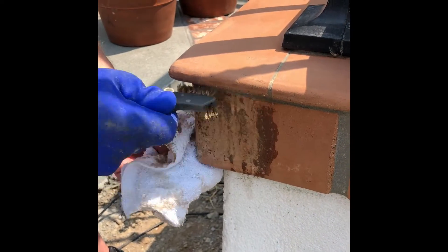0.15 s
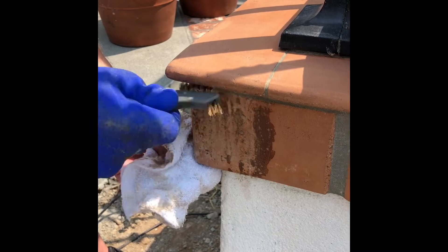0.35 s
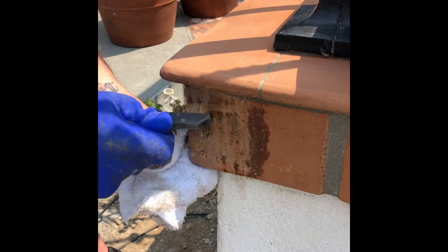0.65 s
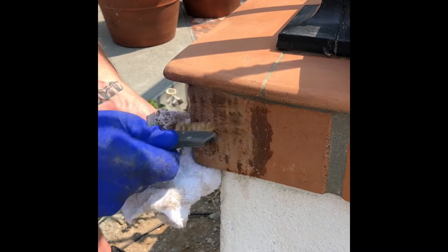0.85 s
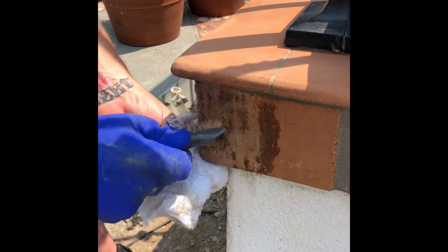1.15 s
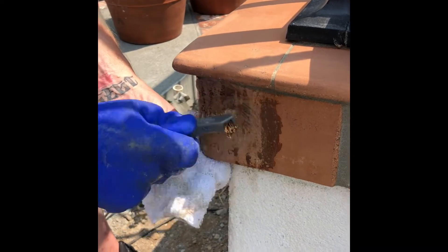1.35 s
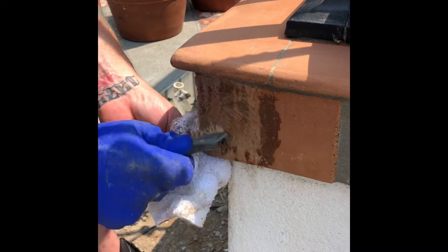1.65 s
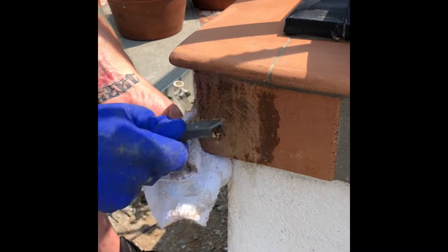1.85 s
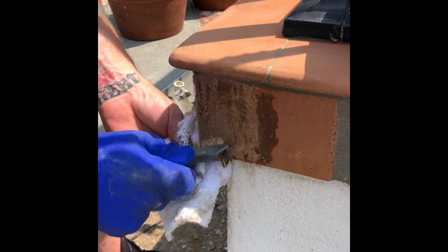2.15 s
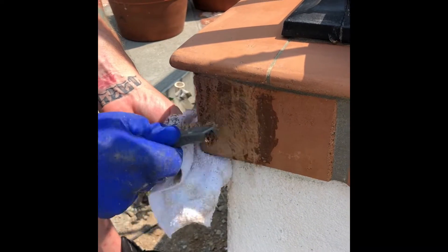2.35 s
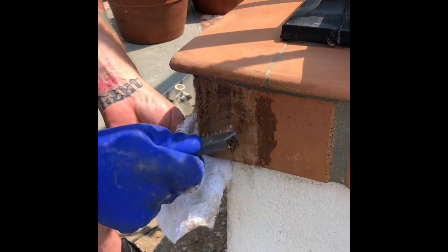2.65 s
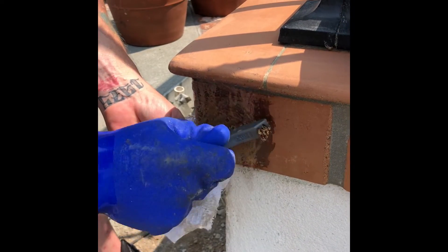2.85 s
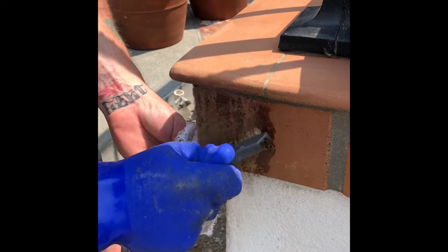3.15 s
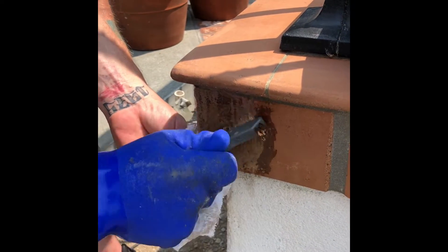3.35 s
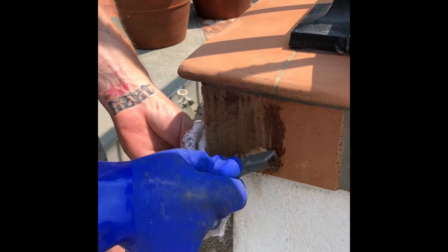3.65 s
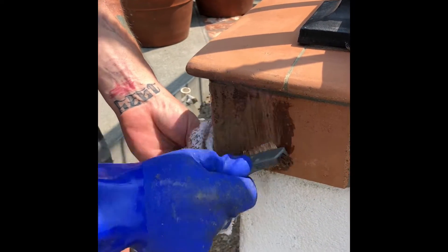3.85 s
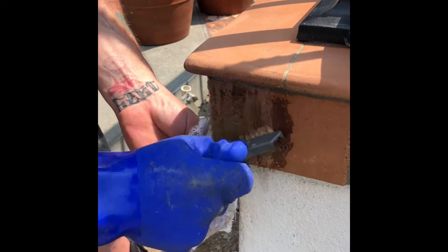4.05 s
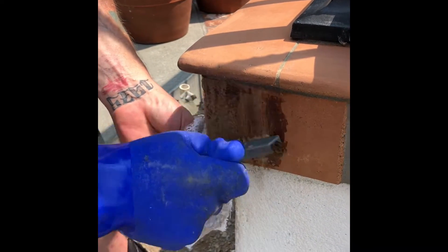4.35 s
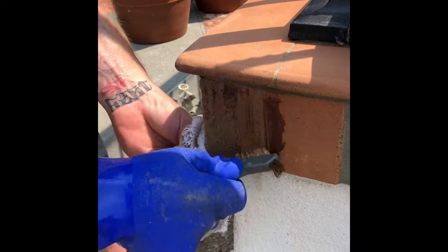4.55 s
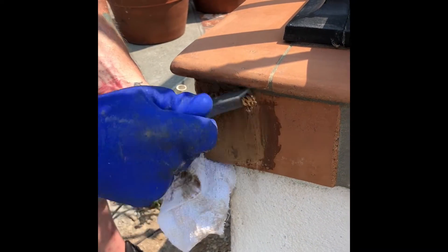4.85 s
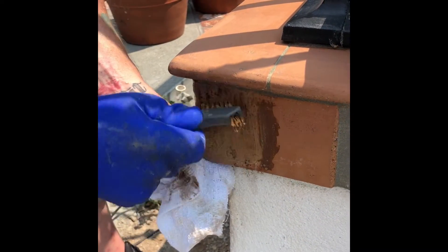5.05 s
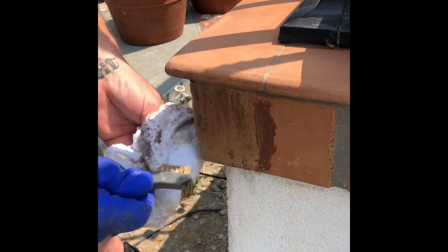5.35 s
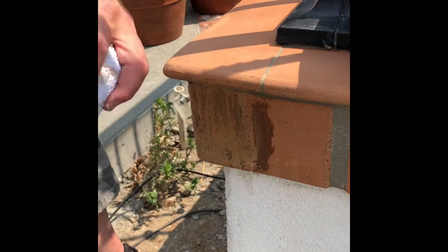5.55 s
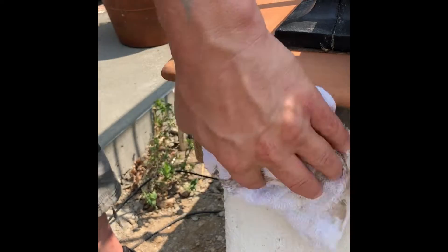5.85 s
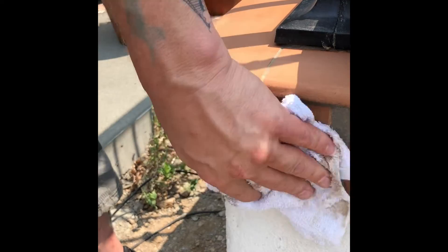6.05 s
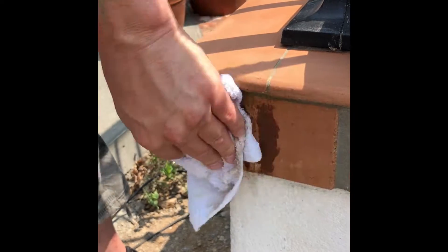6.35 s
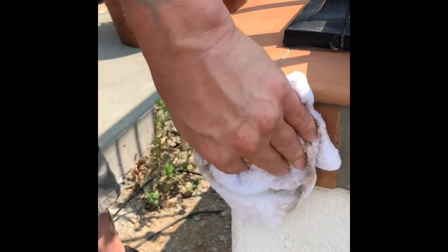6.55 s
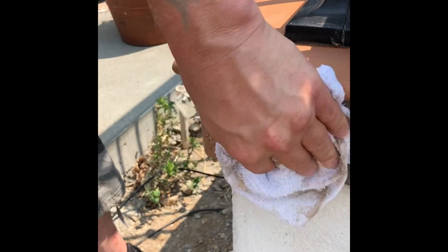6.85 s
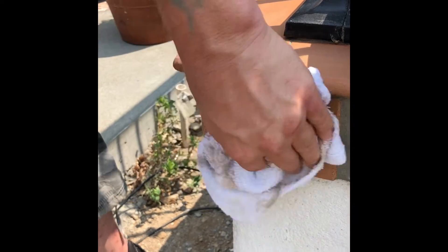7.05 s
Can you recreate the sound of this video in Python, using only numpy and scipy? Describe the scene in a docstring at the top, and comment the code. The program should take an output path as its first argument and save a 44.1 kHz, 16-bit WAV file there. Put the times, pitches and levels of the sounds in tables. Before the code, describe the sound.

A small wire brush scrubs rough tile outdoors in quick scratchy strokes, then a rag softly wipes it.

```python
"""An outdoor step, one mono microphone close to a wet, rough tile, quiet air behind it.
A small wire brush starts with quick strokes: each wire snags on the grit, slips and rings.
From 1 s it rubs steadily; from 3 s come harder strokes, some jamming with a dry tick.
Just after 5 s the brush is lifted, a rag is gathered up, and its fibres hiss through six wipes.
Soft low bumps reach the microphone throughout."""
import sys
import numpy as np
from scipy import signal
from scipy.fft import rfft, irfft, next_fast_len
from scipy.io import wavfile

SR = 44100
rng = np.random.default_rng(int(sys.argv[2]) if len(sys.argv) > 2 else 0)


def output_pcm(signal):
    """Save a mono or channel-first signal as 16-bit PCM at the path in sys.argv[1].

    Samples are clipped to [-1, 1] before scaling.
    """
    pcm = np.clip(np.atleast_2d(signal).T, -1, 1) * 32767
    wavfile.write(sys.argv[1], SR, np.round(pcm).astype(np.int16))


N = 317123

# brush pushed away, wires digging in: (start [s], length [s], level [dB])
PUSH_STROKES = [(-0.055, 0.12, -34.5), (0.16, 0.13, -34), (0.392, 0.12, -33.3), (0.622, .125, -32.5),
                (0.86, 0.12, -32), (3.036, 0.15, -34), (3.294, 0.11, -31), (3.521, 0.11, -30.5),
                (3.732, 0.12, -30.6), (3.969, 0.091, -28.5), (4.192, 0.1, -29), (4.412, 0.1, -29.6),
                (4.64, 0.12, -29.5), (4.864, 0.11, -28.5), (5.092, .1, -29)]
# brush pulled back, wires trailing: (start [s], length [s], level [dB])
PULL_STROKES = [(0.053, 0.12, -34), (0.277, 0.13, -35.5), (0.495, 0.14, -35), (0.744, 0.13, -35.2),
                (3.188, 0.12, -33), (3.407, .12, -32), (3.63, 0.11, -31), (3.849, 0.12, -32.5),
                (4.066, 0.14, -32.5), (4.295, .12, -32), (4.523, 0.13, -31.2), (4.75, 0.12, -31.5),
                (4.963, 0.13, -33.5)]
# steady rubbing without a turn: (start [s], end [s], level [dB])
RUB_SPELLS = [(0.964, 3.066, -38), (5.14, 5.377, -36.5)]
# the hand bears down once a round: (time [s], half-width [s], level [dB])
RUB_SWELLS = [(1.157, 0.094, -32), (1.403, 0.061, -32), (1.657, 0.049, -30.5), (1.905, 0.055, -33),
              (2.135, 0.055, -33), (2.397, 0.044, -34.5), (2.674, 0.039, -32.5)]
# scratch of the wire tips: (frequency [Hz], level [dB])
SCRATCH_SPECTRUM = [(500, -16), (1300, -23), (2100, -15.5), (2800, -1.5), (4400, -2), (6000, -1),
                    (7000, 1.3), (8300, 1.2), (9400, -2), (12500, -0.9), (14200, -0.5), (16000, -4.5)]
# treble as the brush tilts and moves over the tile: (time [s], gain [dB])
TILT_TREBLE = [(0, 1), (0.35, -2.5), (0.68, 2.5), (1.0, -3.5), (1.5, -0.5), (2.5, -2.5), (3.35, 0),
               (4.5, -2.5), (5.3, -3)]
# bending resonances of the wire tufts: (frequency [Hz], width [Hz], gain [dB])
TUFT_MODES = [(2750, 170, -3.5), (3135, 290, 0), (4070, 270, 0.5), (4950, 280, 1), (5910, 350, 3)]
# plastic head and handle under pressure: (frequency [Hz], level [dB])
HANDLE_SPECTRUM = [(400, -33), (900, -10), (1400, -4), (2000, 2), (2700, 1), (3600, -0.5), (6000, -31)]
# tufts jamming at the end of a hard stroke: (time [s], level [dB])
JAM_TICKS = [(1.954, -41.5), (4.048, -25.5), (4.281, -32), (4.503, -24.5), (4.952, -37), (5.176, -24.5)]
# rag wipes: (start [s], length [s], attack [s], level [dB], hollow rub gain [dB], treble gain [dB])
RAG_WIPES = [(6.085, 0.29, 0.097, -38, -11, 0.5), (6.383, 0.2, 0.082, -42, -4.5, -1),
             (6.615, 0.14, 0.032, -39, -3, 7), (6.771, 0.13, .033, -42.5, -1, 1.5),
             (6.925, 0.13, 0.056, -31.5, -10.5, -11), (7.087, 0.1, 0.018, -45, 0.5, 5)]
# hiss of the rag's fibres: (frequency [Hz], level [dB])
FIBRE_SPECTRUM = [(1200, -47), (2000, -11), (3200, -7.5), (4200, -3), (5700, 1), (7700, 0.5), (10000, -2.5),
                  (13000, -4.5), (16000, -11.5)]
# hollow rub under the pressing hand: (frequency [Hz], level [dB])
HOLLOW_SPECTRUM = [(150, -23), (400, -6.5), (700, -4), (1050, 0.5), (1500, -4.5), (2200, -7), (3500, -7)]
# the rag is gathered and rustles on while it wipes: (time [s], level [dB])
RUSTLE_LEVELS = [(5.38, -59), (5.57, -58), (5.72, -64.5), (5.82, -54.5), (5.95, -52.5), (6.02, -57.5),
                 (6.38, -58), (6.6, -58), (7.19, -61)]
# rustling cloth: (frequency [Hz], level [dB])
RUSTLE_SPECTRUM = [(700, 6), (1200, 8), (3000, -11), (5200, -3.5), (8000, -12.5), (12000, -16),
                   (16000, -21)]
# the glove creases on the handle: (time [s], level [dB])
GLOVE_CREASES = [(0.34, -54.5), (0.6, -55.5), (1.07, -55), (1.98, -49.5), (3.3, -74)]
# creasing rubber: (frequency [Hz], level [dB])
CREASE_SPECTRUM = [(250, -3), (550, -6), (1000, 1), (1300, -6.5), (2000, -20)]
# stronger bumps on the microphone: (time [s], level [dB], pitch [Hz])
STRONG_BUMPS = [(0.038, -35, 184), (0.225, -34, 204), (0.441, -32, 88), (0.685, -34, 109),
                (0.775, -35.5, 151), (1.43, -35, 208), (1.65, -28, 132), (1.848, -27, 270.4),
                (1.958, -30.5, 209), (2.016, -26, 175), (2.103, -26, 147), (2.179, -33.5, 243),
                (2.227, -25.5, 198), (2.474, -34.5, 163), (2.701, -34, 216), (2.963, -38.5, 224),
                (3.07, -32.5, 224), (3.284, -34.5, 152), (3.61, -35, 110), (3.87, -32.5, 102),
                (3.9, -29.5, 187), (4.002, -23, 245), (4.724, -39.5, 102), (5.355, -34.5, 186),
                (5.868, -38, 109), (6.131, -35.5, 212), (6.707, -35.5, 251), (6.86, -36, 173),
                (7.006, -31.5, 298), (7.056, -35.5, 158)]
# rise and fall of the low rumble: (time [s], level [dB])
RUMBLE_LEVELS = [(0, -48.5), (0.7, -48.5), (1.46, -56.5), (2.16, -45), (2.75, -59), (3.1, -48.5),
                 (3.65, -59.5), (4.0, -50.5), (4.35, -58.5), (4.85, -54), (5.6, -62), (6.6, -58.5),
                 (7.19, -45)]
# colour of the rumble: (frequency [Hz], level [dB])
RUMBLE_SPECTRUM = [(20, -29), (40, -5.5), (65, 4), (110, -7), (160, -6.5), (260, -10), (450, -19),
                   (900, -49)]
# distant outdoor wash: (frequency [Hz], level [dB])
AIR_SPECTRUM = [(25, -19), (60, -1.5), (150, 6.5), (320, -2.5), (600, 0.5), (1150, 1.5), (2000, -2),
                (3200, -8.5), (6000, -20.5), (16000, -32)]
# steady low resonances in the wash: (frequency [Hz], width [Hz], gain [dB])
DRONE_MODES = [(66.4, 12, 3.5), (152, 37, 10.5)]

USUAL_STROKE_DB, BRUSH_LIFT_S = -30.5, 5.35


def brush():
    """Wire tips slip on the grit, close up; pressure adds slips, treble and handle, and damps the tufts."""
    level = friction_level()
    effort = level / level.max()
    pressure_db = np.maximum(20 * np.log10(level + 1e-9) - USUAL_STROKE_DB, -6)
    snaps = slips(per_s=3000 + 45000 * effort, spread_db=3.5)
    pings = wire_pings(per_s=5000 + 12000 * effort)
    scratch = coloured(snaps + from_db(-7.5) * pings, SCRATCH_SPECTRUM, TUFT_MODES)
    tilt_db = np.interp(seconds(), *np.transpose(TILT_TREBLE))
    treble_db = -0.3 + 0.62 * pressure_db + tilt_db + 1.1 * drift(14)
    tufts = from_db(-15 - 0.5 * pressure_db) * tuft_snags()
    handle = from_db(-15.5 + 0.64 * pressure_db) * noise(HANDLE_SPECTRUM)
    grit = from_db(0.85 * drift(70) + 0.6 * drift(350))
    return level * grit * (brightened(scratch, treble_db, corner_hz=9600) + tufts + handle)


def friction_level():
    """Pushes, pulls and rounds of rubbing add in power to give the level of the brush."""
    power = from_db(-57) ** 2 * (seconds() < BRUSH_LIFT_S)   # the wires still touch at the turns
    for start, length, db in PUSH_STROKES:
        brake_s = 0.027 * 0.5 ** (max(db - USUAL_STROKE_DB, 0) / 2)   # harder pushes stop faster
        push = stroke(start, length, attack_s=0.051, curve=1.19, brake_s=brake_s, db_per_s=27)
        flip = from_db(-13.5) * bell(start + length + 0.0077, 0.018)   # the wires flip over
        power += from_db(db) ** 2 * (push ** 2 + flip ** 2)
    for start, length, db in PULL_STROKES:
        pull = stroke(start, length, attack_s=0.038, curve=1.54, brake_s=0.033, db_per_s=-34)
        power += (from_db(db) * pull) ** 2
    waver_db = -0.8 * drift(25)
    for s, width, db in RUB_SWELLS:
        power += (from_db(db) * bell(s, width)) ** 2
        waver_db -= 2.5 * bell(s + 0.045, 0.021)   # the hand eases off
        waver_db += 0.84 * bell(s + 0.12, 0.054)   # the way back is a little louder
    for start, end, db in RUB_SPELLS:
        power += (from_db(db + waver_db) * held(start, end, attack_s=0.065, release_s=0.043)) ** 2
    return np.sqrt(power)


def stroke(start_s, length_s, attack_s, curve, brake_s, db_per_s):
    """Level of one stroke: the wires bite, hold under changing pressure, and brake late."""
    at = np.arange(max(int(start_s * SR) + 1, 0), int((start_s + length_s) * SR))
    t = at / SR - start_s
    bite = np.clip(t / attack_s, 0, 1) ** curve
    speed = 1 - np.clip(1 - (length_s - t) / brake_s, 0, 1) ** 1.11
    out = np.zeros(N)
    out[at] = bite * speed ** 2 * from_db(db_per_s * (t - length_s / 2))
    return out


def wire_pings(per_s, low_hz=2473, high_hz=11980, count=44, contact_db=10.5):
    """Single wires spring free and ring, each at its own pitch, as they come in and out of contact."""
    plucks = slips(per_s, spread_db=1.5)
    plucked_wire = rng.integers(0, count, N)
    pitches = np.geomspace(low_hz, high_hz, count) * (1 + 0.016 * rng.standard_normal(count))
    contact_times = np.arange(0, N / SR, 0.07)
    out = np.zeros(N)
    for wire, hz in enumerate(pitches):
        at = np.flatnonzero(plucked_wire == wire)
        contact = np.interp(at / SR, contact_times, rng.uniform(-1.05, 1, len(contact_times)))
        clicks = np.zeros(N)
        clicks[at] = plucks[at] * from_db(contact_db * contact) * np.sqrt(hz)
        out += ring(clicks, hz, t60_s=0.021)
    return rms_one(out)


def tuft_snags(swing_db=12):
    """The four lowest tuft resonances ring louder and softer as each tuft catches on the grit."""
    out = np.zeros(N)
    for hz, _, _ in TUFT_MODES[:4]:
        catch = from_db(swing_db * np.tanh(drift(18)))
        out += ring(slips(per_s=4000, spread_db=0) * catch, hz, t60_s=0.012)
    return rms_one(out)


def slips(per_s, spread_db):
    """Tiny random snaps of slipping wire, of even power whatever their rate."""
    chance = np.clip(per_s / SR, 1e-4, 1)
    sizes = from_db(spread_db * np.minimum(rng.exponential(1, N), 5)) * rng.choice([-1, 1], N)
    return rms_one(sizes * (rng.random(N) < chance) / np.sqrt(chance))


def jams(start_hz=3090):
    """The wires stop against the tile: their rough chatter slows and dies in a few milliseconds."""
    ticks = [(s, db, start_hz) for s, db in JAM_TICKS]
    chatter = falling_swings(ticks, rise_s=0.0007, decay_s=0.0026, sag_s=0.00345, end_hz=1080, rough=1.75)
    return bass_cut(chatter, corner_hz=700, order=3)


def rag():
    """Countless fibres hiss over the tile while the pressing hand adds a hollow rub."""
    hiss_level, rub_level, treble_db = np.zeros((3, N))
    for start, length, attack, db, rub_db, bright_db in RAG_WIPES:
        speed = held(start, start + length, attack, release_s=0.24 * length)
        hiss_level += from_db(db) * speed ** 2
        rub_level += from_db(db + rub_db) * speed   # the rub outlasts the hiss
        treble_db += bright_db * speed
    hiss = hiss_level * brightened(noise(FIBRE_SPECTRUM), treble_db, corner_hz=9000)
    rub = rub_level * noise(HOLLOW_SPECTRUM)
    return (hiss + rub) * from_db(0.7 * drift(110))


def hands():
    """A rubber glove creases faintly while it holds the brush; later the cloth rustles in the hand."""
    grip = from_db(-68) * (seconds() < BRUSH_LIFT_S)
    creases = sum(from_db(db) * bell(s, 0.077) for s, db in GLOVE_CREASES)
    glove = (grip + creases) * from_db(3 * drift(30)) * noise(CREASE_SPECTRUM)
    cloth = gain_curve(RUSTLE_LEVELS) * noise(RUSTLE_SPECTRUM)
    return glove + cloth


def microphone_bumps(small_per_s=12, low_hz=97.4, high_hz=231.5):
    """Soft buffets on the microphone, thinned by its bass cut; small random ones follow the rumble."""
    timing, strength, pitch = rng.random((200, 3)).T
    s = (np.arange(len(timing)) + timing) / small_per_s
    db = np.interp(s, *np.transpose(RUMBLE_LEVELS)) + 10 + 2.5 * (2 * strength - 1)
    hz = low_hz * (high_hz / low_hz) ** pitch
    small = np.column_stack([s, db, hz])[s < N / SR]
    bumps = list(STRONG_BUMPS) + list(small)
    swings = falling_swings(bumps, rise_s=0.0038, decay_s=0.012, sag_s=0.008, end_hz=64, rough=0.77)
    return bass_cut(swings, corner_hz=38, order=3)


def outdoors():
    """Behind the step: a gently swelling distant wash and a lumpy low rumble."""
    wash = from_db(-55 + 0.38 * drift(6)) * noise(AIR_SPECTRUM, DRONE_MODES)
    rumble = from_db(2.84 * drift(30)) * gain_curve(RUMBLE_LEVELS) * noise(RUMBLE_SPECTRUM)
    return wash + rumble


def falling_swings(rows, rise_s, decay_s, sag_s, end_hz, rough):
    """Short uneven swings that sag towards end_hz; rows are (time [s], level [dB], pitch [Hz])."""
    out = np.zeros(N)
    for s, db, hz in rows:
        at = np.arange(max(round((s - 3 * rise_s) * SR), 0), min(round((s + 6 * decay_s) * SR), N))
        t = at / SR - s
        swell = np.exp(-np.where(t < 0, (t / rise_s) ** 2, t / decay_s))
        cycles = end_hz * t + (hz - end_hz) * sag_s * (1 - np.exp(-t / sag_s))
        jitter = rough * np.interp(2 * (cycles - cycles[0]), np.arange(64), rng.standard_normal(64))
        out[at] += from_db(db) * swell * np.sin(2 * np.pi * (cycles + rng.random()) + jitter)
    return out


def ring(clicks, hz, t60_s):
    """Each click sets a decaying sine ringing."""
    decay, angle = from_db(-60 / (t60_s * SR)), 2 * np.pi * hz / SR
    return signal.lfilter([0, np.sin(angle)], [1, -2 * decay * np.cos(angle), decay ** 2], clicks + 1e-18)


def coloured(x, spectrum, resonances=()):
    """Shapes a sound by resonance peaks and a spectrum whose ends fall 12 dB an octave; rms 1."""
    size = next_fast_len(N, real=True)
    hz = np.geomspace(1, SR / 2, 2000)
    knot_hz, knot_db = np.transpose(spectrum)
    octaves_outside = np.abs(np.log2(hz / np.clip(hz, knot_hz[0], knot_hz[-1])))
    db = np.interp(np.log(hz), np.log(knot_hz), knot_db) - 12 * octaves_outside
    for centre, width, peak_db in resonances:
        db += peak_db / (1 + (2 * (hz - centre) / width) ** 2)
    gain = np.interp(np.arange(size // 2 + 1) * SR / size, hz, from_db(db))
    return rms_one(irfft(rfft(x, size) * gain, size)[:N])


def noise(spectrum, resonances=()):
    return coloured(rng.standard_normal(N), spectrum, resonances)


def brightened(x, shelf_db, corner_hz):
    """A moving treble shelf."""
    return x + (from_db(shelf_db) - 1) * bass_cut(x, corner_hz, order=1)


def bass_cut(x, corner_hz, order):
    return signal.sosfilt(signal.butter(order, corner_hz, "high", fs=SR, output="sos"), x)


def drift(per_s):
    """A random wander of spread 1, with per_s new values a second."""
    knots = rng.standard_normal(N // 40)
    return np.interp(seconds() * per_s, np.arange(len(knots)), knots) * np.sqrt(3 / 2)


def bell(centre_s, half_width_s):
    """A smooth swell of height 1."""
    away = (seconds() - centre_s) / half_width_s
    return np.exp(-away ** 2) * (np.abs(away) < 4)


def held(start_s, end_s, attack_s, release_s):
    """Straight attack, hold at 1, straight release."""
    t = seconds()
    return np.clip(np.minimum((t - start_s) / attack_s, (end_s - t) / release_s), 0, 1)


def gain_curve(rows):
    """Gain through rows of (time [s], level [dB]), silent outside them."""
    return from_db(np.interp(seconds(), *np.transpose(rows), left=-120, right=-120))


def from_db(db):
    return 10 ** (np.asarray(db) / 20)


def rms_one(x):
    return x / np.sqrt(np.mean(x ** 2) + 1e-20)


def seconds():
    return np.arange(N) / SR


def scene():
    """The one close microphone feeds both channels."""
    mono = brush() + jams() + rag() + hands() + microphone_bumps() + outdoors()
    return np.array([mono, mono])


def record(dry):
    """The recorder cuts the top steeply."""
    cutoff_hz = 15850
    return signal.sosfilt(signal.ellip(12, 0.1, 90, cutoff_hz, fs=SR, output="sos"), dry)


dry = scene()
out = record(dry)
output_pcm(out)
```